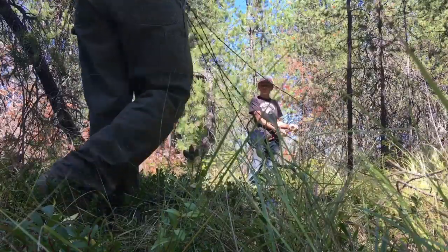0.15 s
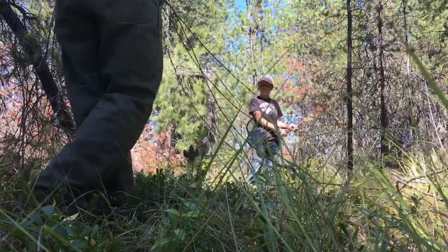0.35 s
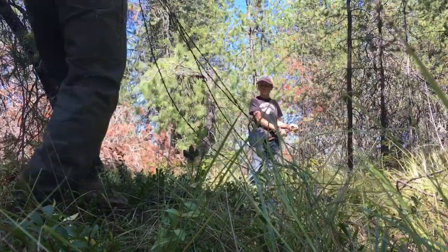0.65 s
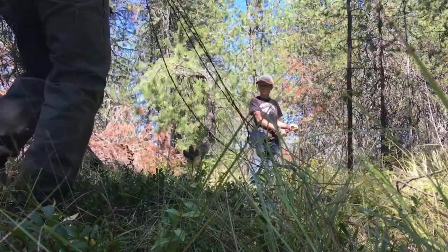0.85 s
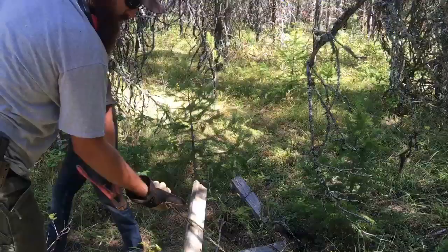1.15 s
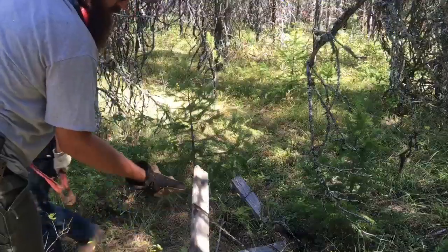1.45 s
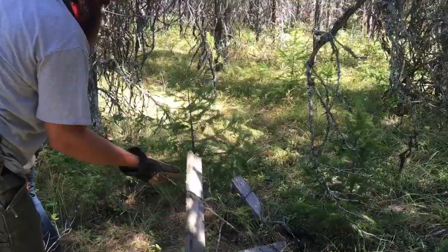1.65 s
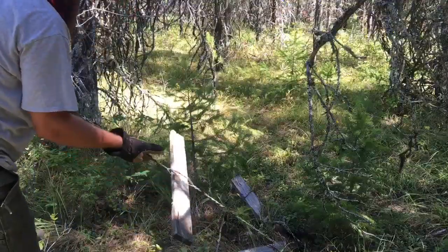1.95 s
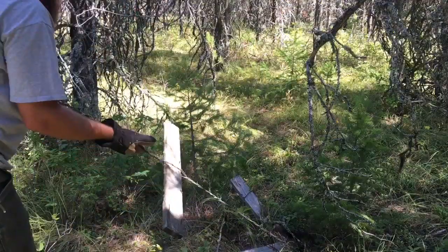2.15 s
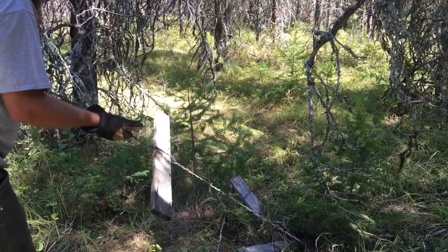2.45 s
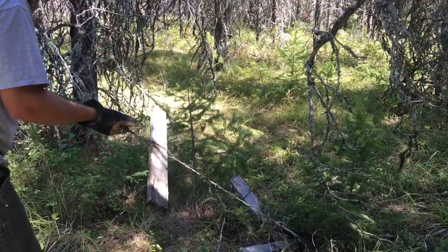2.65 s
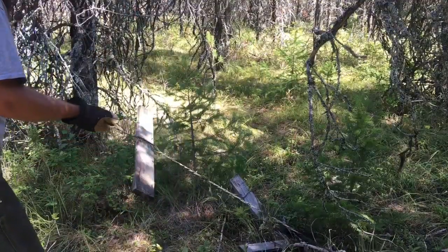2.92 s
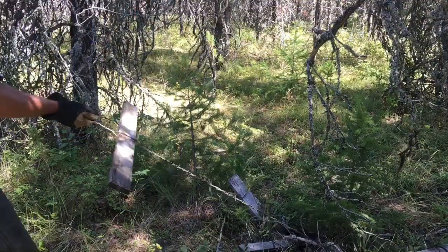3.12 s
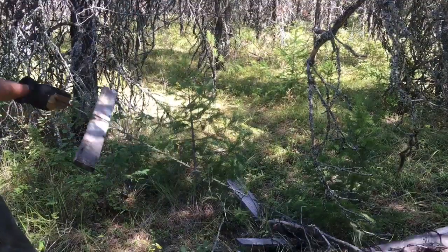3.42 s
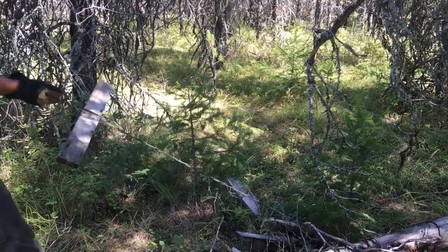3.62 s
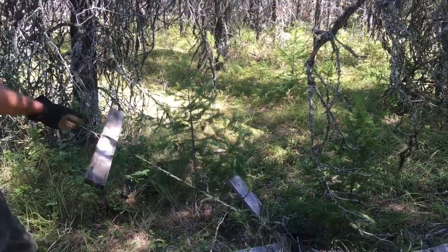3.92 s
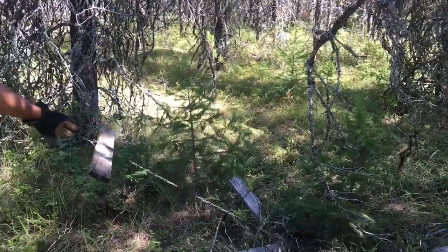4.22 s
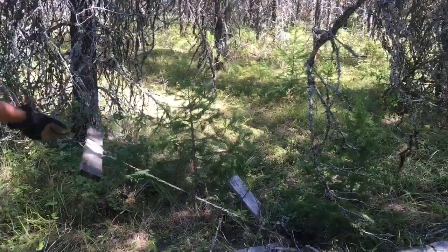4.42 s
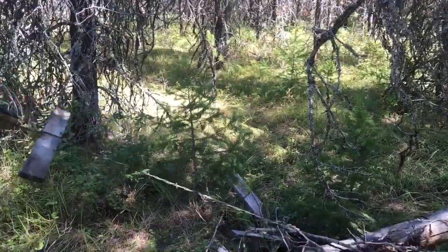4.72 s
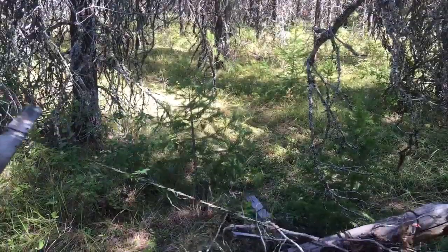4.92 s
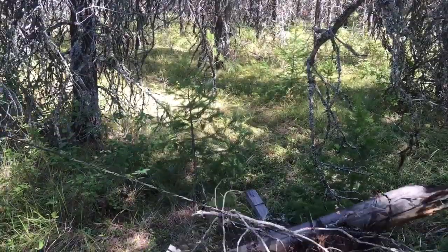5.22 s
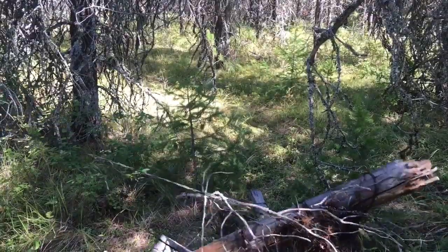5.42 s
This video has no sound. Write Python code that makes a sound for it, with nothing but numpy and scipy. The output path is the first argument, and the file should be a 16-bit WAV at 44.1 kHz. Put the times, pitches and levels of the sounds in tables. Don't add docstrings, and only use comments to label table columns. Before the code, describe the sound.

Quiet footsteps in undergrowth, a sudden cut, then crisp rustling and twig snaps as a wire and hanging wooden post are hauled through a wood.

```python
import sys
import numpy as np
from scipy import signal
from scipy.io import wavfile

SR = 44100
rng = np.random.default_rng(int(sys.argv[2]) if len(sys.argv) > 2 else 0)


def elevation(decibels):
    levels = np.asarray(decibels, float)
    return 10 ** (levels / 20)


def store_wav(level_fs):
    pcm = np.round(np.clip(np.atleast_2d(level_fs), -1, 1) * 32767)
    wavfile.write(sys.argv[1], SR, pcm.T.astype(np.int16))


N = 245637


def rms_one(x):
    return x / np.sqrt(np.mean(x ** 2) + 1e-20)


def peak_one(x):
    return x / np.abs(x).max()


def in_time(rows):
    s, *columns = np.transpose(rows)
    return [np.interp(np.arange(N) / SR, s, c) for c in columns]


def drift(rate):
    hop = 40
    r = np.exp(-2 * np.pi * hop * rate / SR)
    chance = rng.standard_normal(N // hop + 2002)
    slow = signal.lfilter([1], [1, -2 * r, r * r], chance)[2000:]
    return np.interp(np.arange(N) / hop, np.arange(len(slow)), rms_one(slow))


def band_pass(x, low_hz, high_hz):
    return signal.sosfilt(signal.butter(2, [low_hz, high_hz], "band", fs=SR, output="sos"), x)


def high_pass(x, hz, order):
    return signal.sosfilt(signal.butter(order, hz, "high", fs=SR, output="sos"), x)


def resonance(x, hz, width_hz):
    r = np.exp(-np.pi * width_hz / SR)
    poles = [1, -2 * r * np.cos(2 * np.pi * hz / SR), r * r]
    return signal.lfilter([(1 - r * r) / 2, 0, (r * r - 1) / 2], poles, x)


def ring(x, hz, t60):
    r, w = elevation(-60 / (t60 * SR)), 2 * np.pi * hz / SR
    return signal.lfilter([0, np.sin(w)], [1, -2 * r * np.cos(w), r * r], x)


def add(out, s, peak_db, sound):
    i = round(s * SR)
    piece = peak_one(sound)[:N - i]
    out[i:i + len(piece)] += elevation(peak_db) * piece


def rustle():
    # (time [s], speed through the blades [dB], weight on the litter [dB])
    walk = [(0.0, -51.5, -73), (0.19, -52.5, -75), (0.33, -51.5, -64), (0.53, -53, -65.5),
            (0.75, -50.5, -69), (0.91, -55.5, -73.5), (1.14, -48, -67.5), (1.22, -49.5, -64.5)]
    # (time [s], speed through the blades [dB], weight on the litter [dB])
    pull = [(1.25, -58.5, -63.5), (1.42, -53, -64.5), (1.47, -46, -62.5), (1.66, -48.5, -65),
            (1.77, -40.5, -61.5), (2.0, -42.5, -64), (2.11, -45.5, -62.5), (2.5, -41, -60),
            (2.63, -46.5, -63), (3.27, -38, -54), (3.6, -37.5, -55.5), (3.76, -48.5, -59),
            (3.96, -46.5, -56), (4.25, -51, -58), (4.56, -46.5, -56), (4.79, -37.5, -44), (5.1, -37, -46),
            (5.57, -39, -49.5)]
    # (frequency [Hz], level per Hz [dB])
    grass_spectrum = [(2500, -14), (4500, -5.5), (6400, 0), (9000, 1), (13000, 2.5), (16000, -4)]
    twig_spectrum = [(800, -24), (1500, -7), (2200, -3), (3000, -1.5), (4500, -3.5), (7000, -7)]
    litter_spectrum = [(180, -9), (350, -0.5), (600, 0), (1200, -2), (2200, -12)]
    ground_spectrum = [(24, -44), (45, 2.5), (110, -0.5), (250, -2), (450, -10.5), (750, -22.5)]
    speed_db, weight_db = in_time(walk + pull)
    boots = np.arange(N) / SR < walk[-1][0]
    fast, heavy = speed_db + 45, weight_db + 58
    twig_db = -53.5 + 0.83 * fast + 0.37 * heavy + 3 * boots
    ground_db = -59.5 + 0.55 * fast + 0.44 * heavy + 8.5 * boots
    clumps = elevation(0.53 * drift(12) + 0.68 * drift(40))
    grass = crackle(grass_spectrum, clumps * flicks(), 600.0, spread_db=4.5, smooth=1.9, patchy_db=.8)
    twigs = crackle(twig_spectrum, clumps, 500.0, spread_db=5.5, smooth=1.0, patchy_db=1.25)
    litter = crackle(litter_spectrum, clumps, 150.0, spread_db=-5.0, smooth=1.8, patchy_db=2.5)
    ground = crackle(ground_spectrum, clumps, 60.0, spread_db=-6.5, smooth=1.0, patchy_db=3.5)
    vegetation = elevation(speed_db) * grass + elevation(twig_db) * twigs
    return vegetation + elevation(weight_db) * litter + elevation(ground_db) * ground


def flicks():
    per_s, settle_s, jump_db = 35, .004, -12
    jumps = (rng.random(N) < per_s / SR) * np.minimum(rng.exponential(1, N), 2)
    return 1 + elevation(jump_db) * signal.lfilter([1], [1, -np.exp(-1 / (settle_s * SR))], jumps)


def crackle(spectrum, clumps, per_s, spread_db, smooth, patchy_db):
    born = rng.random(N) < per_s * clumps ** 2 / SR
    sizes = elevation(spread_db * np.minimum(rng.exponential(1, N), 4)) * rng.choice([-1, 1], N)
    source = rms_one(born * sizes) + smooth * clumps * rng.standard_normal((2, N))
    hz, db = np.transpose(spectrum)
    edges = hz[0] * 2 ** np.arange(0, np.log2(hz[-1] / hz[0]) + .34, 1 / 3)
    out = 0
    for k, (low, high) in enumerate(zip(edges, np.minimum(edges[1:], .45 * SR))):
        band = band_pass(source[k % 2], low, high)
        band_db = np.interp(np.log(low * high) / 2, np.log(hz), db)
        out = out + band * elevation(band_db + patchy_db * drift(18.0))
    return rms_one(out)


def snaps():
    # (time [s], peak level [dB], pitch [Hz])
    thin_stems = [(0.057, -38, 9450), (0.2833, -23.5, 11900), (0.5452, -31.5, 6390), (1.1973, -38, 12700),
                  (1.204, -34, 12000), (1.262, -38, 9770), (1.2874, -38, 14900), (1.731, -20, 9500),
                  (1.7799, -20, 12400), (1.818, -16, 11700), (1.914, -21, 12100), (1.9684, -19, 13300),
                  (2.1134, -30, 9280), (2.1565, -26, 4800), (2.314, -24.5, 8200), (2.3253, -23, 8660),
                  (2.389, -19, 14900), (2.757, -23.5, 5200), (3.0734, -25, 13000), (3.1694, -27, 12400),
                  (3.4258, -17, 12300), (3.43, -20, 12800), (3.6972, -27, 11900), (4.3515, -38, 13600),
                  (5.1844, -19, 13900), (5.2125, -12, 12400), (5.249, -11.5, 9800), (5.3344, -26, 12200),
                  (5.389, -25, 13000), (5.515, -20.5, 6400)]
    # (time [s], peak level [dB], pitch [Hz], break time [s], woody part re peak [dB])
    thick_stems = [
        (0.3628, -18.5, 6400, 0.00042, -33),
        (1.1293, -25, 6100, 0.0011, -21),
        (1.4477, -10.5, 10000, 0.00052, -19),
        (3.5549, -11.5, 11000, 0.00024, -30),
        (4.889, -27, 5330, 0.00089, 3),
        (4.9831, -14.5, 6500, 0.0012, -5),
        (5.1055, -17.5, 4800, 0.0027, -13),
    ]
    out, t = np.zeros(N), np.arange(900) / SR
    table = [(s, db, hz, .00024, -39 - .63 * (db - 12)) for s, db, hz in thin_stems] + thick_stems
    chance = rng.standard_normal((len(table), len(t)))
    for (s, db, hz, break_s, woody_db), noise in zip(table, chance):
        fresh = np.exp(-(t / max(break_s, .0001)) ** 2)
        tearing = elevation(-13) * noise * np.exp(-t / (break_s * 2.0 + .002))
        shock = np.sign(noise) * fresh + tearing
        bright = peak_one(high_pass(shock, 0.56 * hz, 2))
        stem = 1.16 * peak_one(resonance(shock, hz, .22 * hz))
        woody = elevation(woody_db - 1.5) * peak_one(band_pass(shock, 1300, 5800))
        add(out, s + .0004, db - .8, bright + stem + woody)
    return out


def limb_cracks():
    # (time [s], peak level [dB], pitch [Hz], rattle [s])
    cracks = [(0.346, -45, 2620, 0.0011), (0.546, -40, 2450, 0.00045), (0.959, -42.5, 3350, 0.0016),
              (1.137, -41.5, 1830, 0.0015), (1.155, -46, 1890, 0.00099), (1.196, -44.5, 2260, 0.0023),
              (2.114, -45, 2450, 0.00097), (2.419, -38, 3300, 0.0013), (3.209, -44, 2690, 0.0014),
              (3.246, -36, 2470, 0.001), (3.378, -33, 2240, 0.0014), (3.403, -32, 2820, 0.00075),
              (3.532, -31, 2800, 0.00081), (3.578, -35, 2850, 0.0013), (3.602, -37, 2570, 0.00089),
              (3.633, -38, 1870, 0.0013), (3.894, -38, 2180, 0.0013), (4.331, -43, 1180, 0.001),
              (4.534, -36, 3070, 0.0015)]
    # (time [s], peak level [dB], pitch [Hz], rattle [s])
    breaks = [(4.716, -22, 3050, 0.0019), (4.746, -26, 1760, 0.002), (4.759, -30.5, 1870, 0.0016),
              (4.776, -13, 1920, 0.0011), (4.784, -22.5, 3220, 0.004), (4.801, -26.5, 1070, 0.0021),
              (4.812, -23.5, 1730, 0.001), (4.825, -39, 740, 0.00085), (4.873, -29, 1640, 0.0016),
              (4.887, -15.5, 1870, 0.00068), (4.983, -18.5, 3300, 0.0014), (5.031, -31, 1330, 0.00086),
              (5.046, -20.5, 1830, 0.00087), (5.105, -26, 2190, 0.0008), (5.138, -34, 2100, 0.00092),
              (5.24, -25.5, 4240, 0.00099), (5.311, -35, 1600, 0.0012), (5.414, -32, 1300, 0.0005),
              (5.441, -35, 2520, 0.0013), (5.53, -35, 1700, 0.0011)]
    # (frequency [Hz], level [dB], t60 [s])
    deadwood = [(1040, 13, 0.0057), (1935, -6.5, 0.015), (2280, 4, 0.0023), (2710, 0.5, 0.0037),
                (3350, -7.5, 0.012), (4430, -1, 0.0049), (5660, -2.5, 0.0026)]
    return knocks(cracks + breaks, deadwood, cycles=36.0, scatter_db=0.5, thin=.78)


def post_knocks():
    # (time [s], peak level [dB], pitch [Hz], rattle [s])
    blows = [(1.754, -39, 1000, 0.0014), (1.847, -39.5, 1540, 0.0024), (1.875, -40, 1550, 0.0022),
             (1.958, -40, 1500, 0.0018), (1.971, -33, 1500, 0.0015), (2.033, -43.5, 1210, 0.0019),
             (2.157, -36.5, 1580, 0.0019), (2.204, -33, 1540, 0.0033), (2.448, -28.5, 1740, 0.0037),
             (2.738, -34, 1680, 0.0033), (2.879, -45, 1420, 0.0015), (2.924, -36, 1770, 0.0017),
             (3.123, -30, 1510, 0.0026), (3.31, -34.5, 1540, 0.002)]
    # (frequency [Hz], level [dB], t60 [s])
    post = [(650, -2, 0.015), (1160, -8, 0.0071), (1540, -1, 0.034), (1940, 3, 0.0098), (2450, 2, 0.0065),
            (3350, 6, 0.017), (5300, -8, 0.0063)]
    return knocks(blows, post, cycles=35.0, scatter_db=2.8, thin=.3)


def knocks(table, modes, cycles, scatter_db, thin):
    out, t = np.zeros(N), np.arange(3500) / SR
    chance = rng.standard_normal((len(table), len(t)))
    strengths = rng.normal(0, scatter_db, (len(table), len(modes)))
    for (s, db, hz, rattle_s), noise, strength in zip(table, chance, strengths):
        age = t / max(rattle_s, .0003)
        contact = noise * np.abs(noise) * age * np.exp(-age)
        body = 0.91 * peak_one(ring(contact, hz, cycles / hz))
        for (mode_hz, mode_db, t60), more_db in zip(modes, strength):
            near_db = -3.0 * abs(np.log2(mode_hz / hz))
            body = body + elevation(mode_db + more_db + near_db) * peak_one(ring(contact, mode_hz, t60))
        add(out, s, db, high_pass(body, thin * hz, 6))
    return out


def scrapes():
    # (time [s], length [s], level [dB rms])
    strokes = [
        (4.577, 0.024, -40),
        (4.616, 0.048, -34.5),
        (4.661, 0.021, -40),
        (4.696, 0.041, -37.5),
        (4.79, 0.0084, -39),
        (4.792, 0.029, -40),
        (4.883, 0.012, -28),
    ]
    # (frequency [Hz], width [Hz], level [dB])
    branch = [(2240, 560, -22), (2950, 890, 2.5), (3350, 150, 8.5), (4300, 490, 2.5), (1500, 1300, -7)]
    t = np.arange(N) / SR
    slips = rng.standard_normal(N) * elevation(4.0 * rng.standard_normal(N))
    wood = 0
    for k, (hz, width, db) in enumerate(branch):
        once = resonance(slips, hz, width * 1.7)
        wood = wood + elevation(db) * (-1) ** k * resonance(once, hz, width * 1.7)
    stroke = 0
    for s, length, db in strokes:
        stroke = stroke + elevation(db) * np.clip(np.minimum(t - s, s + length - t) / 0.0061, 0, 1)
    return stroke * rms_one(wood)


def thuds():
    # (time [s], peak level [dB], pitch [Hz], cycles to die)
    blows = [(0.364, -37.5, 258, 9.8), (0.371, -39, 132, 5.3), (0.393, -46, 180, 6.7),
             (0.462, -47, 286, 7.2), (0.493, -46.5, 224, 6.0), (0.41, -51, 404, 14), (0.645, -51, 330, 7.6),
             (1.139, -42.5, 447, 6.0), (0.753, -49.5, 119, 8.1), (1.13, -36.5, 120, 16),
             (1.639, -45, 174, 8.8), (3.538, -43, 186, 12), (3.64, -41, 187, 33), (4.303, -36.5, 280, 13),
             (4.312, -31, 114, 9), (4.353, -32.5, 332, 9.3), (4.379, -41, 94.2, 8.5),
             (4.42, -30.5, 104, 6.1), (4.595, -42, 177, 22), (4.629, -40, 337, 8.0), (4.72, -36, 345, 6.9),
             (4.793, -34, 509, 5.8), (5.413, -31.5, 400, 3.2)]
    out, t = np.zeros(N), np.arange(6000) / SR
    chance = rng.standard_normal((len(blows), len(t)))
    wobble = signal.lfilter([1.6e-4], [1, -1.98, .99 ** 2], chance)
    for (s, db, hz, cycles), uneven, grit in zip(blows, wobble, rng.standard_normal(wobble.shape)):
        age = hz * t
        turns = age + 0.54 * (1 - np.exp(-age / 0.41)) + 1.2 * uneven
        puff = 1.6 * signal.lfilter([.08], [1, -.92], grit) * np.exp(-age / 0.55)
        envelope = (1 - np.exp(-age / 0.18)) * elevation(-60 * age / max(cycles, 2))
        add(out, s, db, (np.sin(2 * np.pi * turns) + puff) * envelope)
    return out


def trunks(x):
    dull = signal.lfilter([.4], [1, -.6], x)
    echoes = [(.0043, -14), (.011, -22.5), (.019, -21.5)]     # (delay [s], level [dB])
    return sum(elevation(db) * np.pad(dull, (round(lag * SR), 0))[:N] for lag, db in echoes)


def scene():
    contacts = snaps() + limb_cracks() + post_knocks() + scrapes()
    return (rustle() + thuds() + contacts + trunks(contacts))[None]


def low_pass(x):
    return signal.sosfilt(signal.butter(12, 16980, fs=SR, output="sos"), x)


def record(dry):
    # (frequency [Hz], width [Hz], level [dB])
    case_dips = [(3720, 1050, -3.5), (4940, 1070, -5), (7620, 1600, -4.5), (10520, 760, -6)]
    # (time [s], level [dB])
    join = [
        (1.205, -1),
        (1.222, -7),
        (1.237, -32),
        (1.255, -4.5),
        (1.275, -2.5),
    ]
    x = elevation(3.5) * dry
    for hz, width, db in case_dips:
        x = x - (1 - elevation(db)) * resonance(x, hz, width)
    x = x * elevation(in_time(join)[0])
    x = signal.sosfilt(signal.cheby2(16, 34, 15950, fs=SR, output="sos"), x)
    return low_pass(x)


dry = scene()
out = record(dry)
store_wav(out)
```